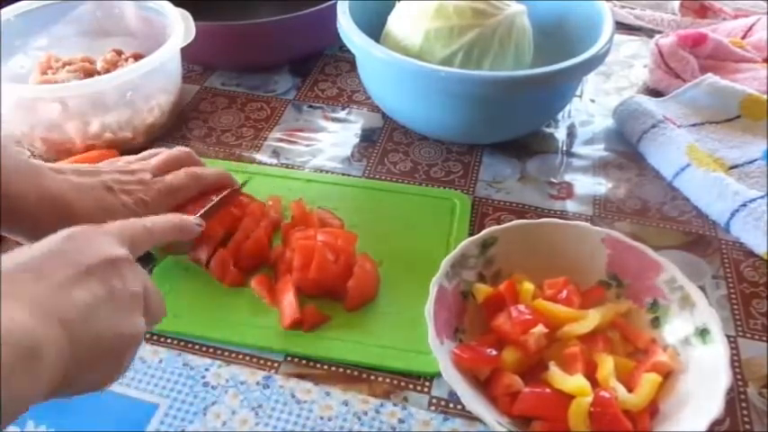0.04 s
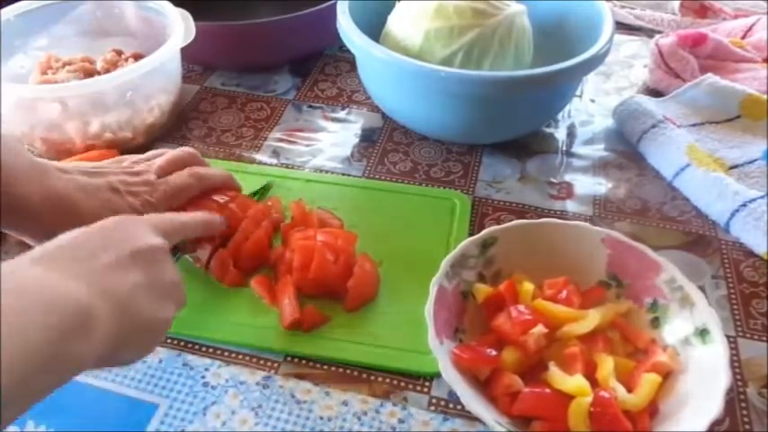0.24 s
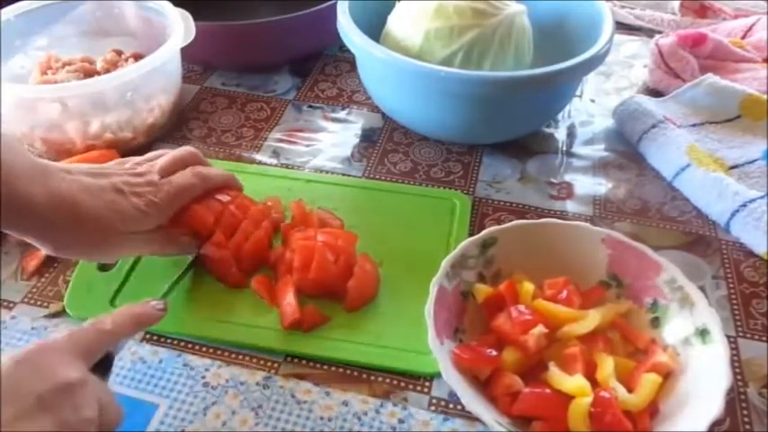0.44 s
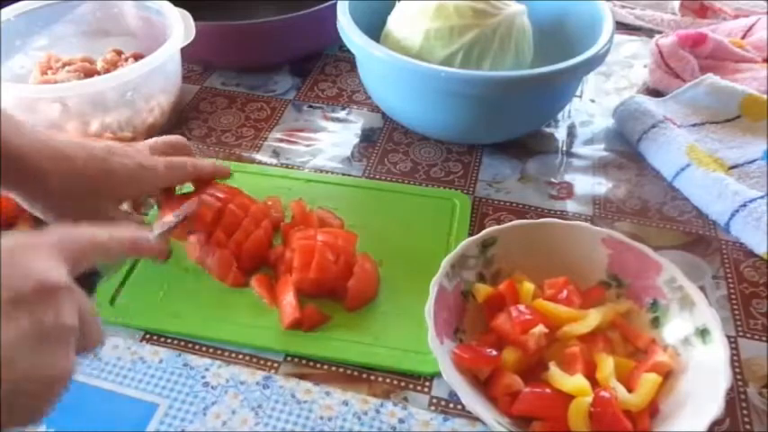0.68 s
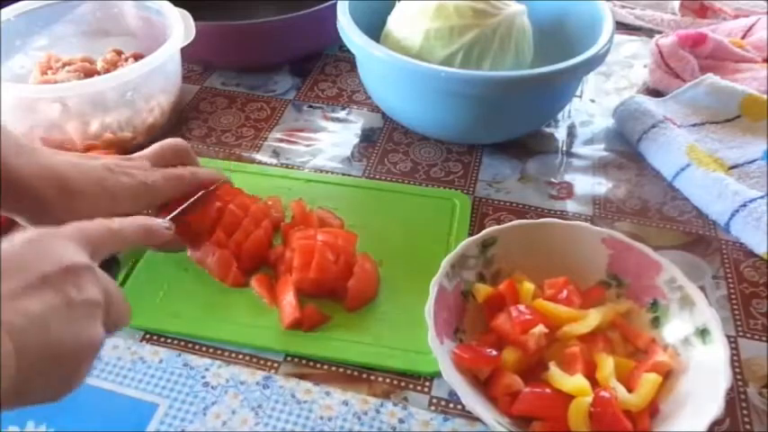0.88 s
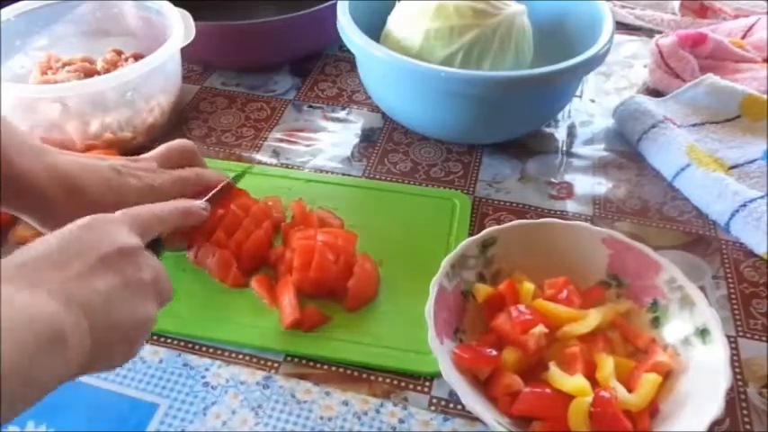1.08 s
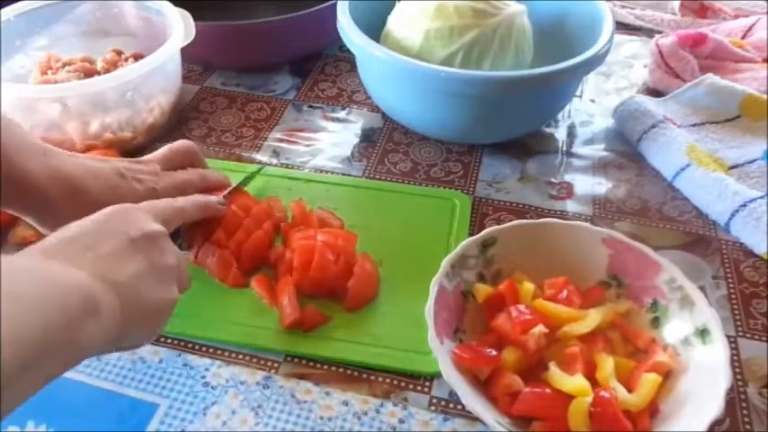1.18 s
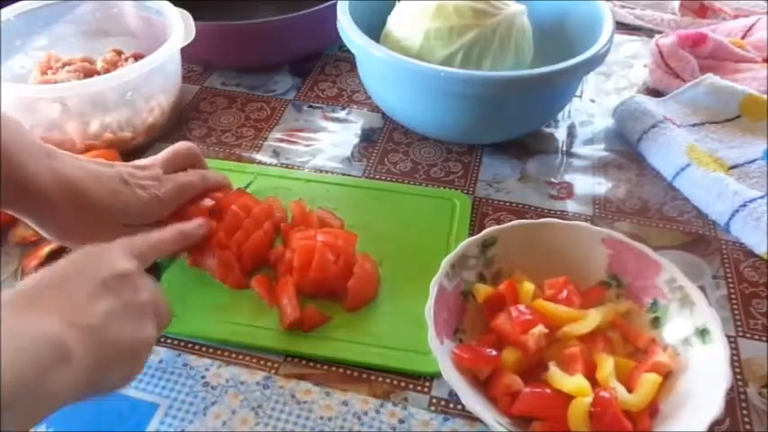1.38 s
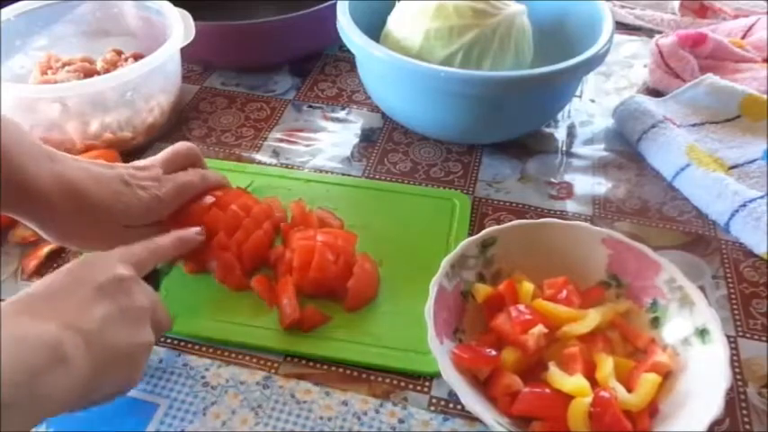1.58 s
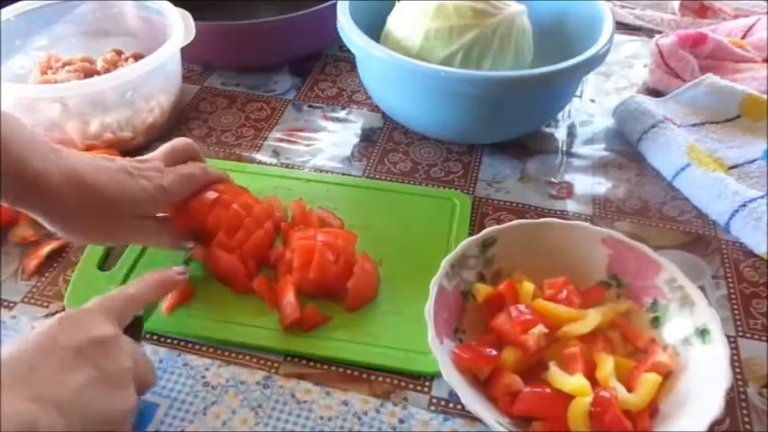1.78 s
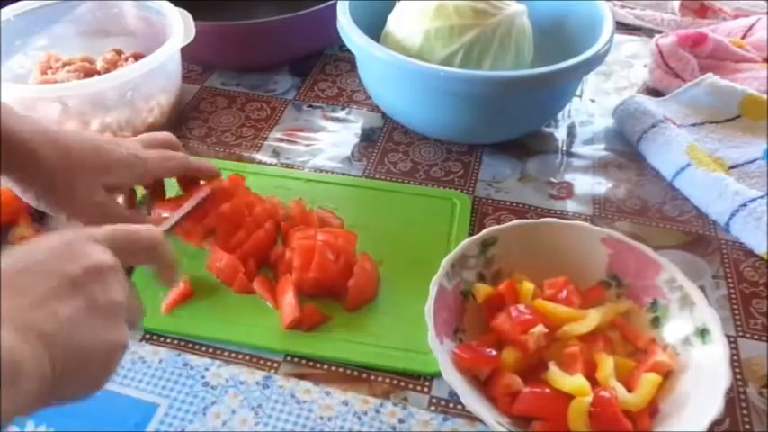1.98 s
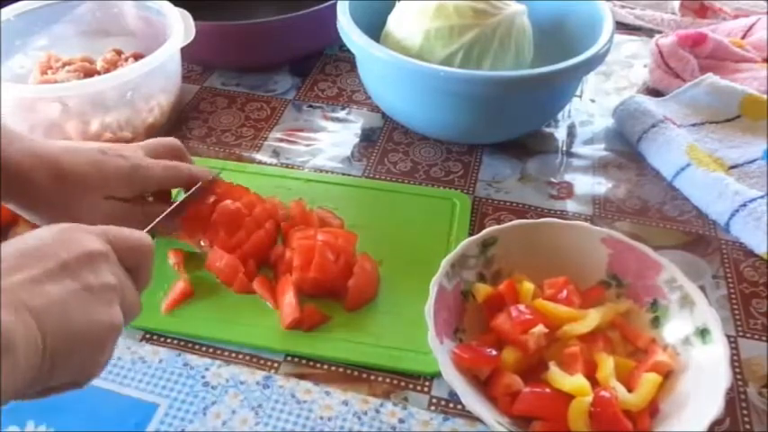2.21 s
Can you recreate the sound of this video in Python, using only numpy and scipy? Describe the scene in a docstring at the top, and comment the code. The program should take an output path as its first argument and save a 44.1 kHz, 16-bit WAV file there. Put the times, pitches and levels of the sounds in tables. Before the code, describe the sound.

A knife dices tomato on a plastic board: quick rasping strokes and two hard raps early, a pause with tiny wet ticks, then softer scrapes and one more rap; close microphone, small kitchen, faint hiss.

```python
"""A kitchen knife dices a tomato on a thin plastic board lying on a table, close to a small camera.
Each scrape is a dense rain of random slips, heard as air noise and through blade, board and table.
Three raps of the edge are double clicks of damped sines, with thud, board ringing and kitchen echoes.
Tiny wet ticks are short bursts of band-passed noise; a steady, slightly patchy hiss lies under it all."""
import sys
import numpy as np
from scipy import signal
from scipy.fft import rfft, irfft, next_fast_len
from scipy.io import wavfile
from scipy.ndimage import uniform_filter1d

SR = 44100
rng = np.random.default_rng(int(sys.argv[2]) if len(sys.argv) > 2 else 0)


def linear_from_db(decibels):
    """Turn decibels (scalar or array-like) into linear amplitude factors; 0 gives 1."""
    return 10 ** (np.asarray(decibels, float) / 20)


def waveform_to_disk(signal):
    """Save audio, clipped to [-1, 1], as 16-bit WAV at the path in sys.argv[1]."""
    frames = np.transpose(np.atleast_2d(signal))
    scaled = np.clip(frames, -1, 1) * 32767
    samples = np.round(scaled).astype(np.int16)
    wavfile.write(sys.argv[1], SR, samples)


N = 99225  # samples, 2.25 s


def unit(x):
    """Scaled to rms 1."""
    return x / np.sqrt(np.mean(x ** 2) + 1e-20)


def along(points, hz):
    """Reads a curve of (Hz, value) points on a log frequency axis."""
    point_hz, value = np.transpose(points)
    return np.interp(np.log(hz + 1), np.log(point_hz + 1), value)


def filtered(x, response):
    """x shaped by a response, real or complex, given as a function of frequency."""
    m = next_fast_len(len(x) + SR // 2)
    return irfft(rfft(x, m) * response(np.fft.rfftfreq(m, 1 / SR)), m)[:len(x)]


def peak(hz, width_hz):
    """Response of one resonance."""
    return lambda f: 1j * f * width_hz / (hz * hz - f * f + 1j * f * width_hz)


# spectrum of the hiss: freq_hz [Hz], level_db [dB per Hz, relative]
HISS_SPECTRUM = [(12, -44), (20, -2), (32, -22.5), (288, -6), (329, -9.5), (406, -4.5), (689, -7.5),
                 (971, -4.5), (1370, -7), (2650, -11), (11000, -16.5), (14300, -11.5), (22000, -120)]
HISS_DB = -64.5


def hiss():
    """Room and microphone hiss: noise with slow random level patches, strongest in the bass."""
    hz, _, cells = signal.stft(rng.standard_normal(N), SR, nperseg=512)
    across_hz = uniform_filter1d(rng.standard_normal(cells.shape), 5, 0)
    field = unit(uniform_filter1d(across_hz, 12, 1))
    depth_db = along([(100, 3.5), (800, 1.54), (4000, 0.2)], hz)[:, None]
    patchy = signal.istft(cells * linear_from_db(depth_db * field), nperseg=512)[1][:N]
    return linear_from_db(HISS_DB) * unit(filtered(patchy, lambda f: linear_from_db(along(HISS_SPECTRUM, f))))


# how long the kitchen rings: freq_hz [Hz], t60_s [s]
KITCHEN_DECAY = [(150, 0.14), (500, 0.26), (1500, 0.12), (3000, 0.18), (6000, 0.13), (11000, 0.28)]
WALL_S = .0033  # gap before the first echo


def kitchen(x, tone_db=lambda hz: 0 * hz):
    """Walls and table answer after a short gap; each frequency of the noise tail dies at its own speed."""
    hz, t, cells = signal.stft(rng.standard_normal(SR // 2), SR, nperseg=128)
    decay_db = -60 * t / along(KITCHEN_DECAY, hz)[:, None]
    tail = signal.istft(cells * linear_from_db(tone_db(hz)[:, None] + decay_db), SR, nperseg=128)[1]
    delayed = np.pad(x, (round(WALL_S * SR), 0))
    return signal.fftconvolve(delayed, tail / np.linalg.norm(tail))[:len(x)]


# strokes of the blade: press_s (most pressure) [s], level_db [dB before the common trim],
# rise_db_per_s [dB/s], fall_db_per_s [dB/s]
BLADE_STROKES = [(.192, -49, 120, 900), (0.352, -51, 274, 101), (0.404, -49.5, 146, 900),
                 (0.453, -52.5, 302, 280), (1.207, -57, 198, 216), (1.236, -51.5, 300, 372),
                 (1.411, -57.5, 199, 197), (1.448, -50, 260, 505), (1.502, -50, 1002, 1497),
                 (1.685, -51.5, 178, 242), (1.723, -53.5, 252, 275), (1.749, -68, 500, 500)]
# colour of each stroke: sing_hz (the blade sings) [Hz], sing_db [dB], board_db [dB],
# table_db (rumble) [dB], tilt_db (treble) [dB per octave]
STROKE_COLOUR = [(3100, -9, -10, -8.5, 2.5), (2850, -9.5, -16, -9.5, 0.5), (2920, 1.5, 5.5, -4.5, 2.5),
                 (2430, -3, -6.5, -10.5, -4), (2960, -4, -21, -10.5, 2.2), (5420, -9.5, -39, -5.5, 4.5),
                 (4560, -24, -19, -5, 6.5), (4280, -7.5, -6, -6.5, .1), (5200, -9, 7, 2, 1.5),
                 (4310, -9, -7.5, -34, 1.2), (2970, -21, -9, -19, -3.5), (298, 6, -25, -7, -14)]
# spectrum of the scrape in the air: freq_hz [Hz], level_db [dB per Hz, relative]
SCRAPE_SPECTRUM = [(120, -69.5), (200, -10), (447, -3.5), (658, 0.5), (1570, 2), (4090, -4), (11000, -19.5),
                   (14300, -47.5), (22000, -120)]
SING_WIDTH_HZ = 350
BOARD_HZ, BOARD_WIDTH_HZ = 1550, 1200
TABLE_HZ, TABLE_WIDTH_HZ = 430, 400
SHAKE_DB, SHAKE_HZ, SHAKE_WIDTH_HZ = -25, 85, 86  # the table shakes under the camera
BOARD_LAG_S, TABLE_LAG_S = 0.0068, 0.0084  # the weight reaches board and table later in the stroke
ROUND_S = 0.004  # rounding of the top of a stroke
GRAINS_PER_S, GRAIN_SPREAD_DB = 9000, 1.5
CLUMP_S, CLUMP_DB = .005, 1.5  # the flesh gives way in clumps
SCRAPE_TRIM_DB, SCRAPE_WET_DB = -3.5, -10.5


def scrapes():
    """Dense slips of the edge sound in the air, in the blade, in the board and in the table."""
    out, t = np.zeros(N), np.arange(N) / SR

    def slips():
        hits = rng.random(N) < GRAINS_PER_S / SR
        return hits * rng.standard_normal(N) * linear_from_db(GRAIN_SPREAD_DB * rng.exponential(size=N))

    def ringing(db, hz, width_hz):
        return linear_from_db(db) * unit(filtered(slips(), lambda f: peak(hz, width_hz)(f) ** 2))

    clump_noise = uniform_filter1d(rng.standard_normal(N), size=round(CLUMP_S * SR))
    clumps = linear_from_db(CLUMP_DB * unit(clump_noise))
    for stroke, colour in zip(BLADE_STROKES, STROKE_COLOUR):
        press_s, level_db, rise, fall = stroke
        sing_hz, sing_db, board_db, table_db, tilt_db = colour

        def press(lag_s):
            since = t - press_s - lag_s
            slope = np.where(t < press_s + lag_s, rise, fall)
            return clumps * linear_from_db(level_db - slope * (np.hypot(since, ROUND_S) - ROUND_S))

        air = unit(filtered(slips(), lambda f: linear_from_db(
            along(SCRAPE_SPECTRUM, f) + tilt_db * np.log2((f + 50) / 2000))))
        table = ringing(table_db, TABLE_HZ, TABLE_WIDTH_HZ)
        table = table + ringing(SHAKE_DB, SHAKE_HZ, SHAKE_WIDTH_HZ)
        blade = ringing(sing_db, sing_hz, SING_WIDTH_HZ)
        board = ringing(board_db, BOARD_HZ, BOARD_WIDTH_HZ)
        stroke_sound = press(0) * (air + blade) + press(BOARD_LAG_S) * board + press(TABLE_LAG_S) * table
        out += linear_from_db(SCRAPE_TRIM_DB) * stroke_sound
    return out + linear_from_db(SCRAPE_WET_DB) * kitchen(out)


FLUTTER_S = .006


def ring(modes, t, scatter_db, rough=0, turn=0):
    """Damped sines, each with a random strength, level flutter (rough) and starting phase (turn)."""
    out = 0
    for hz, db, t60 in modes:
        noise = uniform_filter1d(rng.standard_normal(len(t)), size=round(FLUTTER_S * SR))
        flutter = 1 + rough * unit(noise)
        level = linear_from_db(db + scatter_db * rng.standard_normal() - 60 * t / t60)
        out = out + level * flutter * np.sin(2 * np.pi * (hz * t + turn * rng.random()))
    return out


# moments of the raps: start_s [s]
RAP_STARTS = [.2013, .4091, 1.5063]
# raps of the edge: click_db (click peak before the bass cut) [dB], pitch (click and room colour) [ratio],
# tilt_db (ringing above the thud) [dB per octave], thud_db [dB], wet_db (board and room) [dB]
EDGE_RAPS = [(-14, 1.06, -1.4, 5.5, -1), (-23.5, 1.108, 0, 5, -2.5), (-20.5, 0.994, -0.1, 5.5, -1.5)]
# the click at the contact: freq_hz [Hz, before the pitch ratio], level_db [dB, relative], t60_s [s]
CLICK_MODES = [(1500, 0, .009), (2200, -4, .007), (3000, -4, .007), (3800, -3, .007), (4700, -8, .006),
               (5600, -9, .006), (7000, -16, .004), (8500, -16, .004), (10200, -19, .004)]
# the board on the table: freq_hz [Hz], level_db [dB, before tilt and thud], t60_s [s]
BOARD_MODES = [(346, 8, 0.034), (484.6, -9.5, 0.27), (586, -6.5, 0.15), (1058, -18.5, 0.25),
               (1275, 12.5, 0.073), (1345, -12.5, 0.37), (1584, 6, 0.11), (1830, -10, 0.077),
               (1903, 0, 0.2), (2030, 9, 0.05), (2260, -19, 0.06), (2364, -18.5, 0.22), (2580, -6.5, 0.057),
               (4104, -20.5, 0.036)]
# the table under the board, struck at once: freq_hz [Hz], level_db [dB, before thud_db], t60_s [s]
THUD_MODES = [(356, -33.5, 0.033), (463, -17, 0.032), (900, -27, 0.014)]
# colour of a rap in the room: freq_hz [Hz, before the pitch ratio], level_db [dB, before tilt and thud]
RAP_ROOM_COLOUR = [(150, -15), (300, -5), (480, 0), (750, -6), (1500, 16.5), (2100, 3), (2800, -6.5),
                   (3800, -0.5), (5500, -8.5), (7500, -15.5), (11000, -25)]
CONTACT_S = .0003  # each touch builds up
REBOUND_S, REBOUND_DB = .0007, -2.5  # the edge touches a second time
BOARD_DB, BOARD_SWELL_S, THUD_TOP_HZ = -25, 0.0021, 700
BOARD_ROUGH = .7  # the loose board chatters on the cloth: depth of the flutter
KITCHEN_DB, ROOM_SWELL_S = 12.5, 0.0023  # echoes take a moment to pile up
BASS_CUT_HZ = 250


def raps():
    """A double click of the edge, the thud of the table, the board ringing after it, and the room."""
    out, t = np.zeros(N + SR), np.arange(SR // 2) / SR
    impulse = 1. * (t == 0)
    for start_s, (click_db, pitch, tilt_db, thud_db, wet_db) in zip(RAP_STARTS, EDGE_RAPS):

        def lean_db(hz):
            return np.where(hz < THUD_TOP_HZ, thud_db, tilt_db * np.log2((hz + 1) / 2000))

        def touch():
            modes = [(hz * pitch, db, t60) for hz, db, t60 in CLICK_MODES]
            return ring(modes, t, scatter_db=1, turn=1) * (1 - np.exp(-(t / CONTACT_S) ** 2))

        first = touch()
        rebound = np.pad(touch(), (round(REBOUND_S * SR), 0))[:len(t)]
        click = first + linear_from_db(REBOUND_DB) * rebound

        struck = [(hz, db + lean_db(hz), t60) for hz, db, t60 in BOARD_MODES]
        board = linear_from_db(BOARD_DB) * ring(struck, t, scatter_db=1, rough=BOARD_ROUGH)
        board = board * (1 - np.exp(-t / BOARD_SWELL_S))

        echoes = kitchen(impulse, lambda hz: along(RAP_ROOM_COLOUR, hz / pitch) + lean_db(hz))
        room = linear_from_db(KITCHEN_DB) * echoes * (1 - np.exp(-t / ROOM_SWELL_S))

        thud = linear_from_db(thud_db) * ring(THUD_MODES, t, scatter_db=4)
        rap = click / np.abs(click).max() + thud + linear_from_db(wet_db) * (board + room)
        out[round(start_s * SR):][:len(t)] -= linear_from_db(click_db) * rap
    return filtered(out[:N], lambda f: (1j * f / (BASS_CUT_HZ + 1j * f)) ** 2)


# small wet ticks: start_s [s], level_db (rms level the decay starts from) [dB], pitch_hz [Hz]
WET_TICKS = [(0.611, -60, 2820), (.781, -59, 3100), (0.788, -54, 3060), (1.49, -75, 4270),
             (1.621, -67, 3930), (2.049, -58, 2580)]
TICK_T60_S = 0.023


def ticks():
    """Juice and skin let go with tiny pops: resonant noise that dies quickly."""
    out, t = np.zeros(N + SR), np.arange(SR // 10) / SR
    for start_s, level_db, pitch_hz in WET_TICKS:
        pop = unit(filtered(rng.standard_normal(len(t)), peak(pitch_hz, width_hz=230)))
        out[round(start_s * SR):][:len(t)] += linear_from_db(level_db - 60 * t / TICK_T60_S) * pop
    return out[:N]


def scene():
    """Everything reaches one microphone."""
    return (raps() + ticks() + scrapes() + hiss())[None]


def roll_off(x):
    """The treble ends steeply here."""
    return signal.sosfilt(signal.butter(12, 11180, fs=SR, output="sos"), x)


TOP_HZ, OFFSET = 11150, -.0003


def record(dry):
    """The camera keeps nothing above its band limit and has a slight offset."""
    limited = filtered(dry[0], lambda f: np.clip((TOP_HZ - f) / 300, 0, 1))
    mix = limited + OFFSET
    return roll_off(mix[None])


dry = scene()
out = record(dry)
waveform_to_disk(out)
```